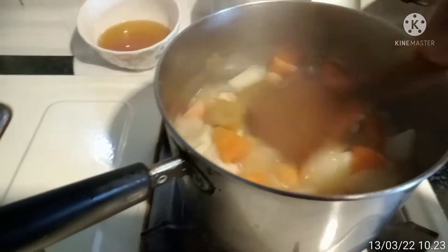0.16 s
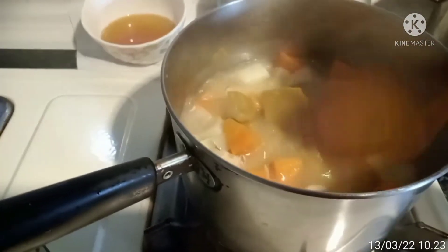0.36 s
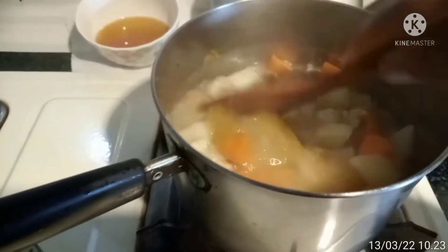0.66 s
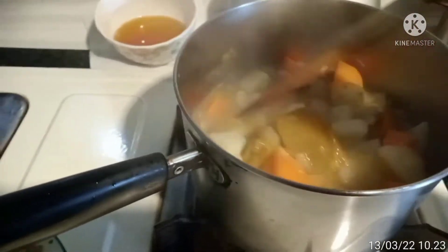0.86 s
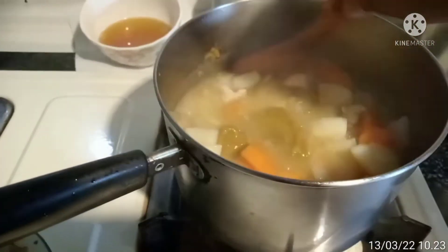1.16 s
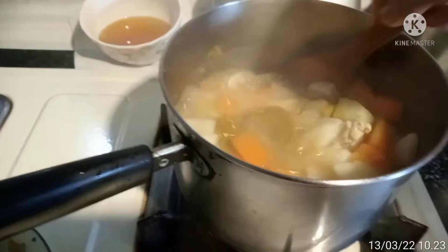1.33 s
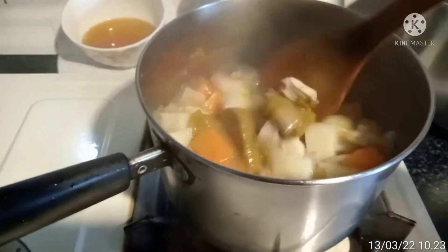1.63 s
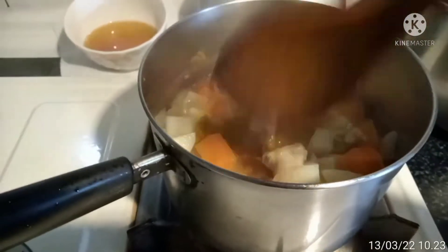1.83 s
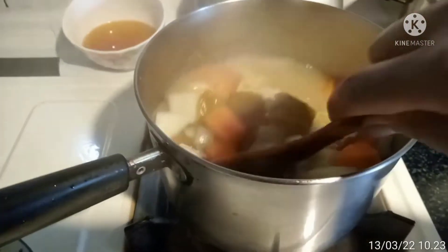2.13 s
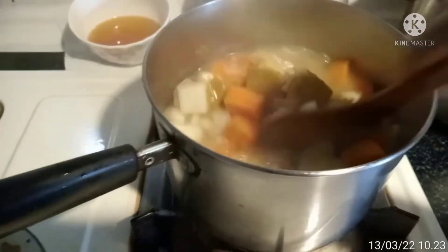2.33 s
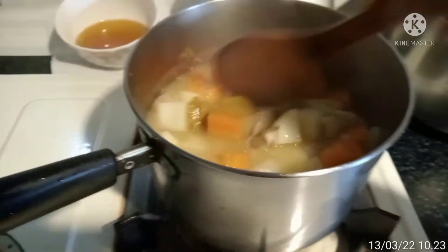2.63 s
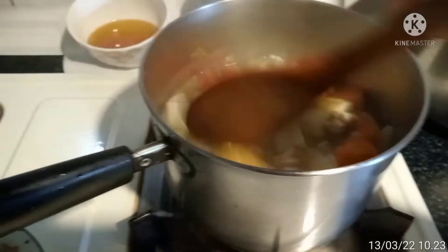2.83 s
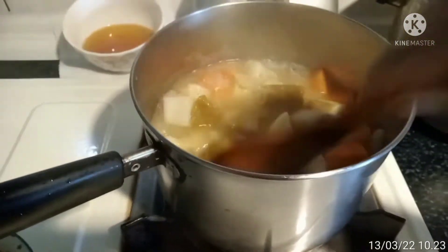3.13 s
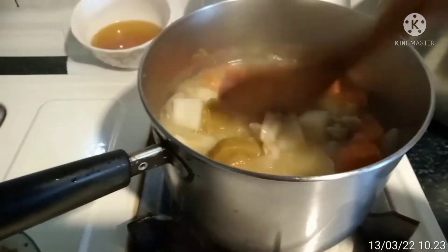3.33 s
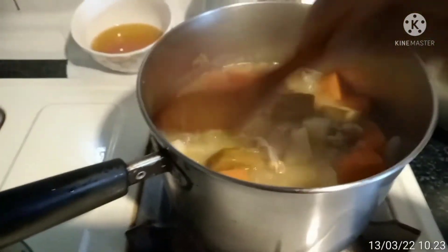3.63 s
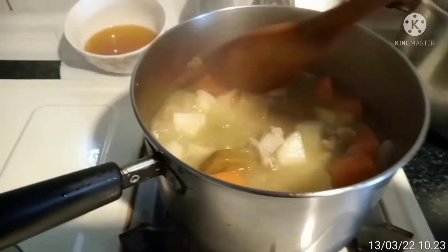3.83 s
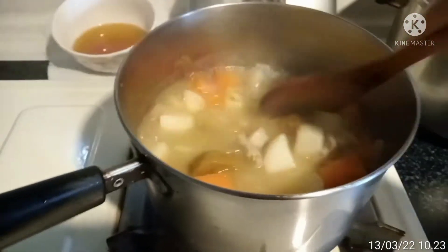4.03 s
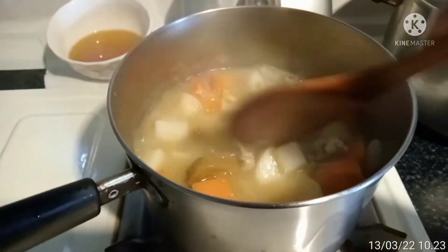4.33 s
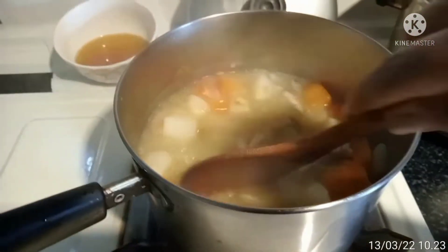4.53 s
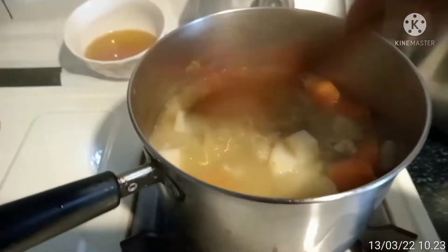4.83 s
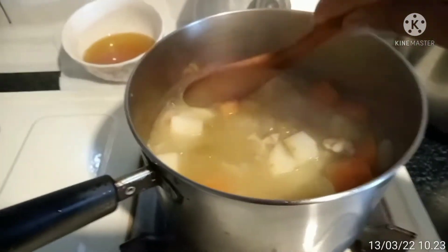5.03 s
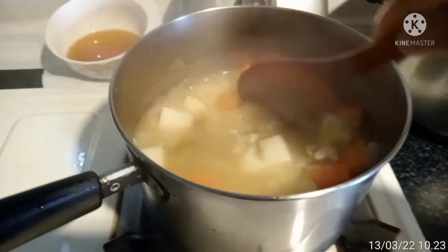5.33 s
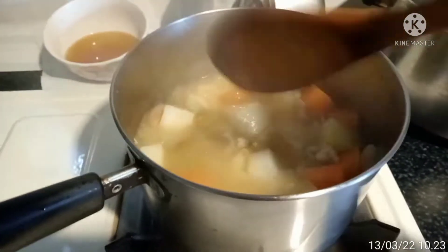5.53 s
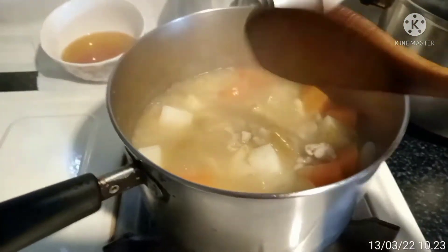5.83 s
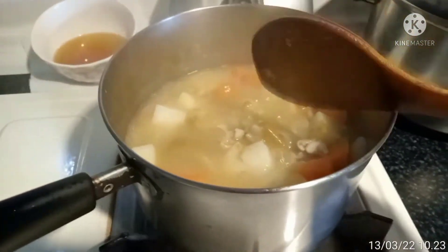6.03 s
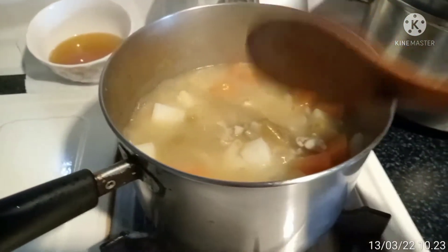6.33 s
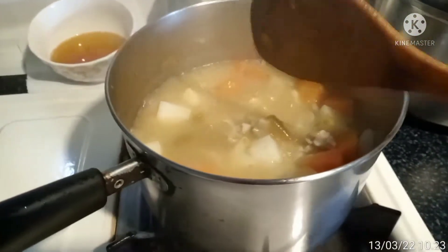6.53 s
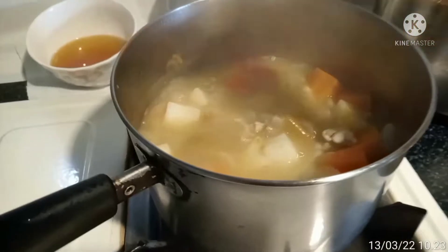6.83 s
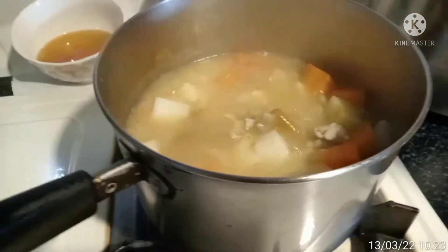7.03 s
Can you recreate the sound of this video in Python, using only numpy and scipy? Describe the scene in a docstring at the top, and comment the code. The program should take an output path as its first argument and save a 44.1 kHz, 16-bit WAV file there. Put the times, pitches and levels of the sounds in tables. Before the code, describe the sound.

Thick stew sloshes and gurgles under a wooden spoon, the metal pan knocks on its stove support, and the spoon is tapped clean on the rim.

```python
"""In a small kitchen, a wooden spoon stirs chunky curry in a steel saucepan on a gas stove.
The sauce sloshes, crackles and pops: filtered clicks, and short sine tones for the bubbles.
Pushed by the spoon, the pan rocks and skids on its support: clicks, fading tones and thin squeals.
Near the end the spoon is rapped five times on the rim, and the pan chatters after each rap.
The burner is a steady rush of filtered noise, and the kitchen adds echoes."""
import sys
import numpy as np
from scipy import signal
from scipy.io import wavfile
from scipy.ndimage import uniform_filter1d

SR = 44100
rng = np.random.default_rng(int(sys.argv[2]) if len(sys.argv) > 2 else 0)


def int16_out(signal):
    """Quantize to a 16-bit WAV file."""
    q = np.round(np.clip(np.atleast_2d(signal).T, -1, 1) * 32767)
    wavfile.write(sys.argv[1], SR, q.astype(np.int16))


N = 316638
TAPS = 4096  # filter size in samples
HZ = np.fft.rfftfreq(TAPS, 1 / SR)
TIME = np.arange(N) / SR  # seconds
AGE = TIME[:SR // 3]  # seconds since one sound began

# Strokes of the spoon through the curry.
# Each row: start in seconds, length in seconds, relative churning level in dB, relative wet crackle level in dB.
STROKES = [(0, 0.13, -54, -56.5), (0.149, 0.12, -60.5, -73.5), (0.273, 0.41, -71, -71),
           (0.594, 0.056, -61, -63.5), (0.753, 0.019, -59.5, -56.5), (0.849, 0.21, -53.5, -59),
           (1.106, 0.4, -55.5, -69), (1.903, 0.034, -91, -58.5), (2.231, 0.17, -53.5, -74),
           (2.436, 0.059, -78, -61.5), (2.797, 0.069, -73.5, -67), (3.032, 0.025, -107, -68),
           (3.465, 0.19, -62, -62.5), (3.742, 0.075, -61, -62), (4.456, 0.16, -73, -101),
           (5.146, 0.39, -58, -69), (6.483, 0.17, -63, -69), (6.756, 0.16, -73.5, -65.5)]
# Tone colour of wet crackle and spray. Each row: frequency in Hz, relative level in dB.
CRACKLE_COLOUR = [(500, -19), (1500, 1), (3300, -1.5), (6000, -8), (9200, -3.5), (12000, -13),
                  (15500, -13.5)]


def amp(db):
    """Turns decibels into a plain gain."""
    return 10 ** (np.asarray(db) / 20)


def unit(x):
    """Scales a sound to an energy of one."""
    return x / np.sqrt(np.sum(x ** 2) + 1e-20)


def evened(x):
    """Scales a sound to an rms (average strength) of one."""
    return unit(x) * np.sqrt(len(x))


def read(points, hz=HZ):
    """Reads between the points of a table, along a log-frequency axis."""
    f, value = np.transpose(points)
    return np.interp(np.log(hz + 1), np.log(f + 1), value)


def add(mix, s, sound):
    """Mixes a sound in at s seconds."""
    part = mix[max(round(s * SR), 0):][:len(sound)]
    part += sound[:len(part)]


def colour(x, gain_db):
    """Filters a sound with the given gain at each of HZ, never acting ahead of time."""
    half = np.log(amp(gain_db))
    both_sides = np.r_[half, half[-2:0:-1]]
    # the Hilbert transform finds the phase that puts the response as early as possible
    taps = np.fft.ifft(np.exp(np.conj(signal.hilbert(both_sides)))).real
    return signal.oaconvolve(x, taps[:TAPS // 2])[:len(x)]


def tilted(x, slope_db):
    """Makes a sound brighter or duller: tilts it by so many dB an octave from 400 to 9000 Hz."""
    octaves = np.log2(np.clip(HZ, 400, 9000) / 1000)
    return unit(colour(x, slope_db * octaves))


def wobble(size, order):
    """Smooth random drift with an rms of about one, averaged over so many samples."""
    return evened(uniform_filter1d(rng.standard_normal(size + order), size=order))[:size]


def grains(per_s, spread_db, size):
    """Random clicks of either sign: many small, a few large."""
    heights = amp(spread_db * np.minimum(rng.exponential(1, size), 4))
    signs = rng.choice([-1, 1], size)
    return heights * signs * (rng.random(size) < per_s / SR)


def ring(modes, contact_s=0.00035):
    """Free ringing: fading sine tones, eased in over the time of contact."""
    free = np.zeros(len(AGE))
    for k, (hz, db, t60) in enumerate(modes):
        sign = (-1) ** (k // 2)  # flips after every second tone
        free += sign * amp(db - 60 * AGE / t60) * np.sin(2 * np.pi * hz * AGE)
    return unit(free * (1 - np.exp(-AGE / contact_s)) ** 2)


def contact(shape, crunch_db, crunch_s):
    """One sharp click with a brief crunch of fading noise."""
    force = amp(crunch_db) * unit(rng.standard_normal(len(AGE)) * np.exp(-AGE / crunch_s))
    force[0] += 1
    return unit(colour(force, read(shape)))


def bubble(hz, cycles, glide):
    """A quickly damped air pocket whose pitch rises as it opens."""
    life = hz * AGE[:TAPS] / cycles
    turns = np.cumsum(hz * (1 + glide * (np.minimum(life, 2) - .5))) / SR
    return unit(np.sin(2 * np.pi * turns) * np.exp(-life) * (1 - np.exp(-6 * life)))


def fizz(per_s, spread_db, cycles, clump_db=0):
    """Tiny wet films tear in 16 pitches; with clump_db, films of one pitch tear in clumps."""
    films = np.zeros(N)
    for hz in np.geomspace(1300, 14000, num=16):
        tears = grains(per_s, spread_db, N) * amp(clump_db * wobble(N, order=600))
        films += signal.oaconvolve(tears, bubble(hz, cycles, glide=0.18))[:N]
    return evened(colour(films, read(CRACKLE_COLOUR) + 10 * np.log10(HZ + 1)))


def burner(gain_db):
    """Steady low rush of the flame and the room, made of filtered noise."""
    # Tone colour of the rush. Each row: frequency in Hz, relative level in dB.
    rush_colour = [(24, -47), (40, -2.5), (123, 1.5), (620, -4), (838, -4), (1080, -15.5), (1560, -5),
                   (2060, -14.5), (7520, -26), (9180, -19.5), (15500, -42.5)]
    return amp(gain_db) * evened(colour(rng.standard_normal(N), read(rush_colour)))


def churning(rise_s, settle_s, rest_db, lumps_db):
    """How hard the sauce moves: it rises with each stroke, holds, then settles; chunks make it lumpy."""
    effort = np.full(N, amp(rest_db))  # never quite at rest
    t = TIME[:SR]
    for s, length, db, _ in STROKES:
        settling = np.exp(-np.maximum(t - length, 0) / settle_s)
        add(effort, s, amp(db) * np.minimum(1, t / rise_s) * settling)
    return effort * amp(lumps_db * wobble(N, order=2200))


def stirring(slosh_db, simmer_db, crackle_db):
    """Chunks churn in thick sauce, as filtered clicks, while small bubbles burst among them."""
    # Tone colour of the churning. Each row: frequency in Hz, relative level in dB.
    slosh_colour = [(30, -33.5), (120, -0.5), (300, -0.5), (420, -9), (850, -6.5), (1150, -26.5),
                    (4000, -19), (9000, -40)]
    effort = churning(rise_s=0.0023, settle_s=0.016, rest_db=-69.5, lumps_db=1.5)
    churn = evened(colour(grains(per_s=900, spread_db=1.5, size=N), read(slosh_colour)))
    simmer = np.zeros(N)
    for hz in np.geomspace(480, 1900, num=16):
        bursts = grains(per_s=3, spread_db=3.0, size=N)
        simmer += signal.oaconvolve(bursts, bubble(hz, cycles=2.0, glide=0.03))[:N]
    # the hot sauce crackles whether or not it is stirred
    crackle = fizz(per_s=3, spread_db=2.2, cycles=4)
    moving = amp(slosh_db) * churn + amp(simmer_db) * evened(simmer)
    return effort * moving + amp(crackle_db) * crackle


def squelches(gain_db, rise_s, fall_db, clump_db, release_s):
    """Clumpy crackle that swells as the spoon bites, fades along the drag and dies away."""
    drag, t = np.zeros(N), TIME[:SR]
    for s, length, _, db in STROKES:
        fading = amp(db + fall_db * (np.minimum(t / length, 1) - .5))
        release = np.exp(-np.maximum(t - length, 0) / release_s)
        add(drag, s, fading * np.minimum(1, t / rise_s) * release)
    films = fizz(per_s=450, spread_db=2.2, cycles=5, clump_db=3)
    return amp(gain_db) * drag * evened(amp(clump_db * wobble(N, order=700)) * films)


def plops(gain_db, splash_db, trail_db, trail_s):
    """Trapped air gurgles: one large bubble, five weaker ones around its pitch and a little splash."""
    # Large gurgles. Each row: start in seconds, relative level in dB, pitch in Hz that the glide bends.
    gurgles = [(0.041, -48, 1280), (0.258, -42, 796), (0.339, -50, 990), (0.523, -49.5, 880),
               (0.629, -43.5, 1310), (0.935, -44, 1400), (0.95, -37, 1200), (1.633, -50, 1360),
               (2.173, -52.5, 1090), (2.3922, -39, 1170), (3.182, -55, 930), (3.489, -32, 1240),
               (3.519, -35, 696), (3.662, -45, 850), (3.923, -46, 810), (3.993, -47.5, 955),
               (4.185, -47, 810), (4.329, -55, 1100), (4.483, -51, 696), (4.823, -51.5, 900),
               (5.004, -46, 590), (6.547, -39.5, 805)]
    out = np.zeros(N)
    for s, db, hz in gurgles:
        level = db + gain_db
        add(out, s, amp(level) * bubble(hz, cycles=1.7, glide=0.07))
        for delay, octaves in rng.standard_normal((5, 2)):
            follower = bubble(hz * 2 ** (0.4 * octaves), cycles=1.5, glide=0.05)
            add(out, s + abs(delay) * trail_s, amp(level + trail_db) * follower)
        splash = contact(CRACKLE_COLOUR, crunch_db=16.0, crunch_s=0.0081)
        add(out, s, amp(level + splash_db) * splash)
    return out


def snaps(gain_db, echo_db, echo_s):
    """Air pockets snap open in the sauce with a dry tick that rattles between the pan walls."""
    # Snaps. Each row: start in seconds, relative level in dB, brightness in dB per octave.
    rows = [(0.6019, -33.5, -10), (0.796, -47, 21), (0.9978, -16, 2), (1.581, -50, 15), (2.417, -43, 17),
            (3.839, -43, 8)]
    # Tone colour of a snap. Each row: frequency in Hz, relative level in dB.
    snap_colour = [(60, -60.5), (600, -27.5), (1500, 1.5), (2400, 2), (3800, -1.5), (5500, -17.5),
                   (15000, -39)]
    # Tone colour of the echoes between the walls. Each row: frequency in Hz, relative level in dB.
    wall_colour = [(1500, -16), (2400, 4.5), (3700, 1), (4700, -6)]
    out = np.zeros(N)
    for s, db, slope_db in rows:
        tick = contact(snap_colour, crunch_db=1.5, crunch_s=0.0022)
        add(out, s, amp(db + gain_db) * tilted(tick, slope_db))
    walls = unit(rng.standard_normal(len(AGE)) * np.exp(-AGE / echo_s))
    return out + amp(echo_db) * signal.fftconvolve(out, colour(walls, read(wall_colour)))[:N]


def scrapes(gain_db, rise_s, release_s):
    """Wood catches and slips on steel so fast that the clicks merge into a rough rub."""
    # Spoon edge rubbing along the wall.
    # Each row: start in seconds, length in seconds, relative level in dB, brightness in dB per octave.
    rubs = [(0.764, 0.02, -51.5, -6.5), (0.853, 0.049, -47, 1.5), (0.932, 0.03, -43, -2),
            (2.428, 0.037, -59, 6), (3.176, 0.064, -72.5, 1.5), (4.534, 0.05, -61.5, -6.5)]
    # Tone colour of the rub. Each row: frequency in Hz, relative level in dB.
    rub_colour = [(100, -14.5), (600, -6.5), (1150, -2), (1550, 5), (6000, -8.5), (8700, -4),
                  (15000, -26.5)]
    out = np.zeros(N)
    for s, length, db, slope_db in rubs:
        slips = grains(per_s=5500, spread_db=1.0, size=len(AGE))
        rub = evened(tilted(colour(slips, read(rub_colour)), slope_db))
        press = np.minimum(1, AGE / rise_s) * np.exp(-np.maximum(AGE - length, 0) / release_s)
        add(out, s, amp(db + gain_db) * press * rub)
    return out


def blows(rows, modes, shape, ring_db, crunch_db, crunch_s, thump_db, push_s, gain_db, soft_ring=0):
    """Each blow clicks, rings the pan and, more slowly, shakes the stove top."""
    # Ringing tones of the stove top under the pan.
    # Each row: frequency in Hz before a random shift, relative level in dB, time to fade by 60 dB in seconds.
    stove_modes = [(116.9, -3.5, 0.08), (147.7, -2, 0.12), (212, -6, 0.072), (241.6, -6.5, 0.11),
                   (284.5, -4, 0.099)]
    pan_shift, stove_shift = 0.023, 0.04  # typical pitch change from blow to blow, as a fraction

    def shifted(table, shift):
        """No two blows land on the same spot, so every tone moves a little."""
        return [(hz * (1 + shift * rng.standard_normal()), db, t60) for hz, db, t60 in table]

    out = np.zeros(N)
    hardest_db = max(row[1] for row in rows)
    for s, db, slope_db in rows:
        # a light touch crunches less, so with soft_ring more of its sound is ring
        ringing = amp(ring_db + soft_ring * (hardest_db - db)) * ring(shifted(modes, pan_shift))
        blow = tilted(contact(shape, crunch_db, crunch_s) + ringing, slope_db)
        thump = unit(ring(shifted(stove_modes, stove_shift)) * (1 - np.exp(-AGE / push_s)))
        add(out, s, amp(db + gain_db) * (blow + amp(thump_db) * thump))
    return out


def thuds():
    """The spoon meets the pan through the curry, which damps the ringing wall."""
    # Thuds. Each row: start in seconds, relative level in dB, brightness in dB per octave.
    rows = [(0.856, -34, -9), (1.771, -26, 4), (1.812, -37, 4.5), (2.418, -40, 0), (3.489, -30.5, -1),
            (3.548, -38.5, 0.5), (5.163, -40, -4)]
    # Ringing tones of the wall damped by curry.
    # Each row: frequency in Hz before a random shift, relative level in dB, time to fade by 60 dB in seconds.
    wall_modes = [(351.4, 3, 0.035), (790, -6.5, 0.045), (1466, -4, 0.035), (3280, -0.5, 0.0076),
                  (4113, -12.5, 0.031)]
    # Tone colour of the contact. Each row: frequency in Hz, relative level in dB.
    thud_colour = [(40, -51), (140, 0), (800, 3), (1300, -11.5), (4000, -12.5), (6000, -30.5),
                   (9000, -25.5), (15000, -50)]
    return blows(rows, wall_modes, thud_colour, ring_db=0.0, crunch_db=-1.5, crunch_s=0.023,
                 thump_db=-6.5, push_s=0.083, gain_db=20.0)


def rocks():
    """The pan knocks on its support as it rocks to rest, ringing with each knock."""
    # Knocks. Each row: start in seconds, relative level in dB, brightness in dB per octave.
    rows = [(1.1834, -26.5, -1), (1.2733, -12.5, 1), (1.340, -15.5, -1), (1.3803, -23.5, 0.5),
            (1.4142, -29, 2.5), (2.2204, -29.5, -0.5), (2.2623, -30.5, -1), (2.2962, -31.5, 0),
            (2.3281, -40.5, 1), (5.2415, -32, -1), (5.3315, -14.5, 0.75), (5.3464, -17.5, -1),
            (5.4372, -16, 1.5), (5.5062, -18, 0), (5.5463, -27, 0), (5.5837, -30, -1),
            (5.6206, -32.5, -1.5), (5.6506, -40, -1.5), (5.7975, -21, -0.5), (5.8411, -28, -0.5),
            (5.877, -31.5, -1), (5.9529, -18.5, 0.5), (6.0013, -25.5, -0.5), (6.0701, -19.5, 0.1),
            (6.1125, -27.5, 1.5), (6.1504, -30, 0.5), (6.2048, -18.5, 0.5), (6.3495, -21.5, 1.6),
            (6.3914, -26, 0.5), (6.4248, -26.5, 0), (6.4562, -31.5, -0.5)]
    # Ringing tones of the pan on its support.
    # Each row: frequency in Hz before a random shift, relative level in dB, time to fade by 60 dB in seconds.
    pan_modes = [(289.4, -10, 0.067), (520, -12.5, 0.069), (724, -11.5, 0.059), (1502, -8.5, 0.092),
                 (1857, -3, 0.035), (2226, -3.5, 0.026), (2974, 6, 0.028), (4170, -4, .02)]
    # Tone colour of the contact. Each row: frequency in Hz, relative level in dB.
    rock_colour = [(40, -18.5), (90, -6), (140, -3), (300, 1.5), (700, -6.5), (1200, -15.5), (1700, -8.5),
                   (2600, -14.5), (4400, -16), (6200, -30), (8800, -19.5), (12000, -33.5), (15000, -38.5)]
    return blows(rows, pan_modes, rock_colour, ring_db=-6.5, crunch_db=14.5, crunch_s=0.017,
                 thump_db=-9, push_s=0.0059, gain_db=16.5, soft_ring=0.4)


def skids(grit_db, gain_db, rise_s):
    """Steel slips on the support in short jerks: grit, and a squeal of the highest tones, which ring on."""
    # Jerks of the pan base along the support. Each row: start in seconds, length in seconds,
    # relative level in dB, lift of the middle squeal tone in dB.
    jerks = [(1.313, 0.039, -47.5, 5), (1.374, 0.023, -45, -18), (1.409, .05, -53.5, 1.5),
             (5.367, 0.037, -54.5, 1), (5.762, 0.03, -52.5, 2), (5.801, .035, -51, 3),
             (5.907, 0.042, -44.5, 0.5), (6.054, 0.022, -44.5, 0), (6.19, .024, -54.5, 4.5),
             (6.335, 0.03, -50, -9.5), (6.356, 0.023, -47, -4)]
    # Thin high tones of the steel, fed by every skid.
    # Each row: frequency in Hz before it wavers, relative level in dB, time to fade by 60 dB in seconds.
    squeal_modes = [(8840, -0.5, 0.03), (10950, 1.5, 0.05), (12410, -13.5, 0.12)]
    # Tone colour of the grit. Each row: frequency in Hz, relative level in dB.
    grit_colour = [(500, -16.5), (4500, 3), (8800, -5), (15000, -15.5)]
    # pitch change between slips and within a slip, as fractions; flutter of the level in dB
    spread, waver, rough_db = 0.0015, 0.0034, 4.5
    out, size = np.zeros(N), len(AGE)
    for s, length, db, middle_db in jerks:
        for k, (hz, level, t60) in enumerate(squeal_modes):
            pitch = hz * (1 + spread * rng.standard_normal() + waver * wobble(size, order=60))
            fade_db = 60 * np.maximum(AGE - length, 0) / t60  # fades once the slip is over
            ring_db = level + middle_db * (k == 1) + rough_db * wobble(size, order=200) - fade_db
            tone = np.sin(2 * np.pi * np.cumsum(pitch) / SR)
            add(out, s, amp(db + gain_db + ring_db) * np.minimum(1, AGE / rise_s) * tone)
        clicks = grains(per_s=660, spread_db=2.0, size=round(length * SR))
        grit = evened(colour(clicks, read(grit_colour)))
        add(out, s, amp(db + grit_db) * signal.windows.tukey(len(grit), .4) * grit)
    return out


def ticks(gain_db, spray_db):
    """A tiny bubble bursts on the hot surface with a short pitched tick and a little spray."""
    # Bursts. Each row: start in seconds, relative level in dB, pitch in Hz that the glide bends.
    bursts = [(2.286, -46, 8800), (2.589, -46, 5500), (3.206, -48.5, 5950), (3.826, -54, 7500),
              (4.031, -46, 3460), (4.146, -49, 5500), (4.670, -52, 5600)]
    out = np.zeros(N)
    for s, db, hz in bursts:
        add(out, s, amp(db + gain_db) * bubble(hz, cycles=3.5, glide=0.1))
        spray = contact(CRACKLE_COLOUR, crunch_db=9, crunch_s=0.0036)
        add(out, s, amp(db + gain_db + spray_db) * spray)
    return out


def raps():
    """The spoon raps the rim, and rim and spoon ring together."""
    # Raps. Each row: start in seconds, relative level in dB, brightness in dB per octave.
    rows = [(5.7532, -12, -1.5), (5.8925, -6, -1.5), (6.0271, -8.5, -0.5), (6.179, -6, -0.5),
            (6.313, -5, -0.5)]
    # Ringing tones of the rim and spoon together.
    # Each row: frequency in Hz before a random shift, relative level in dB, time to fade by 60 dB in seconds.
    rim_modes = [(486, -7.5, 0.026), (1014, -7, 0.025), (1146, -9.5, 0.035), (1600, -12, 0.028),
                 (1800, -18, 0.014), (2257, -7.5, 0.046), (2410, 7, 0.02), (2580, -9.5, 0.03),
                 (3025, -3, 0.037), (4520, -9.5, 0.016), (9200, -1.5, 0.02)]
    # Tone colour of the contact. Each row: frequency in Hz, relative level in dB.
    rap_colour = [(40, -23.5), (130, -5.5), (480, 1.5), (700, -7), (1350, -9), (1750, 3), (2500, -19.5),
                  (3500, -17), (4500, -12), (6000, -26.5), (7600, -28), (9400, -10), (11000, -43)]
    return blows(rows, rim_modes, rap_colour, ring_db=-2.0, crunch_db=7.5, crunch_s=0.0046,
                 thump_db=-13.5, push_s=0.016, gain_db=13.5)


def hollow(x, gain_db):
    """The air in the pan rings along with the sound it is given."""
    # Ringing tones of the air above the sauce.
    # Each row: frequency in Hz, relative level in dB, time to fade by 60 dB in seconds.
    air_modes = [(536.6, 1.5, 0.045), (754, -2.5, 0.054), (832.6, -5.5, 0.14), (1490, -3, 0.056)]
    return x + amp(gain_db) * signal.fftconvolve(x, ring(air_modes))[:N]


def kitchen(x, build_s, near_db, near_s):
    """Echoes: strong early ones from hob and tiles, then a tail that dies band by band."""
    # How long echoes last. Each row: frequency in Hz, time to fade by 60 dB in seconds.
    echo_times = [(100, 0.2835), (500, 0.22), (2000, 0.65), (14000, 0.45)]
    # Tone colour of the echoes. Each row: frequency in Hz, echo level in dB.
    echo_colour = [(70, 1), (140, 2.5), (1000, -1.5), (2800, -12.5), (9000, -11.5), (15000, -20.5)]
    t = TIME[:SR]
    taps = rng.choice([-1., 1.], SR) * (rng.random(SR) < 1 / 10)
    taps *= (1 - np.exp(-t / build_s)) * (1 + amp(near_db) * np.exp(-t / near_s))
    hz, age, z = signal.stft(taps, SR, nperseg=256)
    fade = amp(-60 * age / read(echo_times, hz)[:, None])
    tail = signal.istft(z * fade, SR, nperseg=256)[1]
    return signal.fftconvolve(x, colour(unit(tail), read(echo_colour)))[:N]


def suppressor(x, memory_s, threshold_db, depth_db):
    """Noise suppression: each band is turned down when it sinks far below its own recent average."""
    z = signal.stft(x, nperseg=512, noverlap=384)[2]
    # power is shared over five neighbouring bands
    power = abs(uniform_filter1d(abs(z) ** 2, size=5, axis=1)) + 1e-18
    keep = np.exp(-N / z.shape[-1] / SR / memory_s)
    noise = amp(threshold_db) ** 2 * signal.lfilter([1 - keep], [1, -keep], power)
    gain = np.maximum(power / (power + noise), amp(depth_db))
    return signal.istft(z * gain, nperseg=512, noverlap=384)[1][:, :N]


def scene():
    """Spoon, pan and sauce, close by in the kitchen."""
    wet = stirring(slosh_db=-4, simmer_db=-6.5, crackle_db=-80.5)
    wet += squelches(gain_db=-1.5, rise_s=0.0098, fall_db=-8.0, clump_db=4.0, release_s=0.009)
    wet += plops(gain_db=17.0, splash_db=-15.5, trail_db=-8.5, trail_s=0.011)
    sauce = hollow(wet, gain_db=-17.5)
    sauce += snaps(gain_db=16.5, echo_db=-8, echo_s=0.017)
    sauce += scrapes(gain_db=-2.5, rise_s=0.004, release_s=0.0076)
    sauce += ticks(gain_db=5.5, spray_db=-3)
    pan = thuds() + rocks() + raps()
    pan += skids(grit_db=0.5, gain_db=-2.5, rise_s=0.0021)
    # the sauce feeds the echoes less than the pan does
    echoes = kitchen(pan + amp(-6.5) * sauce, build_s=0.0087, near_db=10, near_s=0.068)
    return (pan + sauce + echoes + burner(gain_db=-69.5))[None]


def record(dry):
    """The small microphone loses the deep bass, noise suppression trims the tails; then the top is cut."""
    bass_cut = signal.butter(3, 62, "high", fs=SR, output="sos")  # 62 Hz
    lean = signal.sosfilt(bass_cut, dry)
    trimmed = suppressor(lean, memory_s=0.088, threshold_db=-26.0, depth_db=-3)
    top_cut = signal.firwin(511, 15850, window=("kaiser", 9), fs=SR)  # 15850 Hz
    return signal.oaconvolve(trimmed, top_cut[None], "same")


dry = scene()
out = record(dry)
int16_out(out)
```